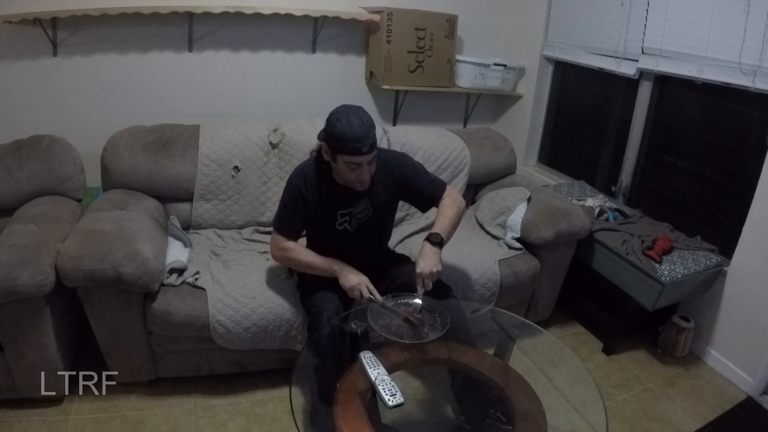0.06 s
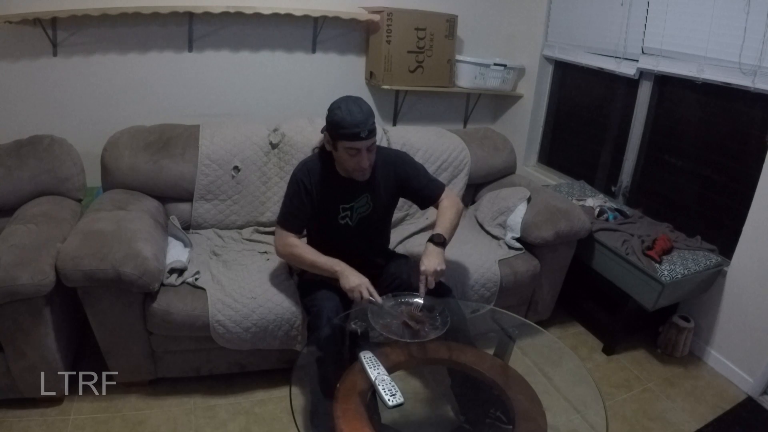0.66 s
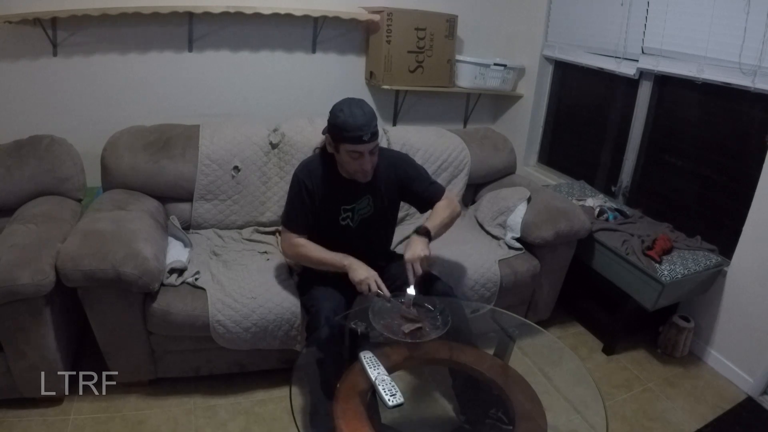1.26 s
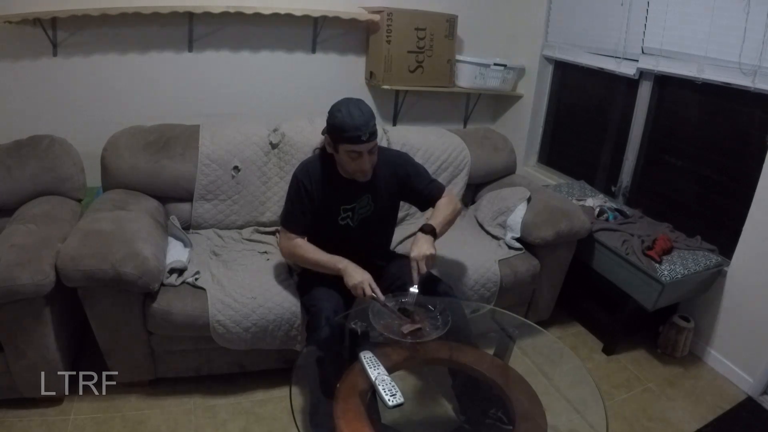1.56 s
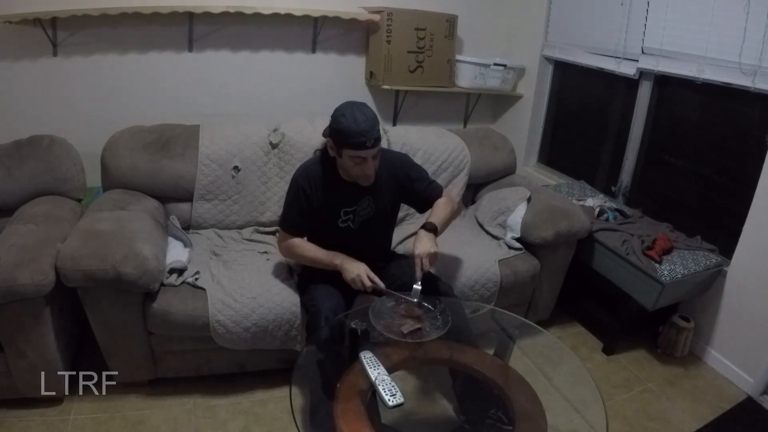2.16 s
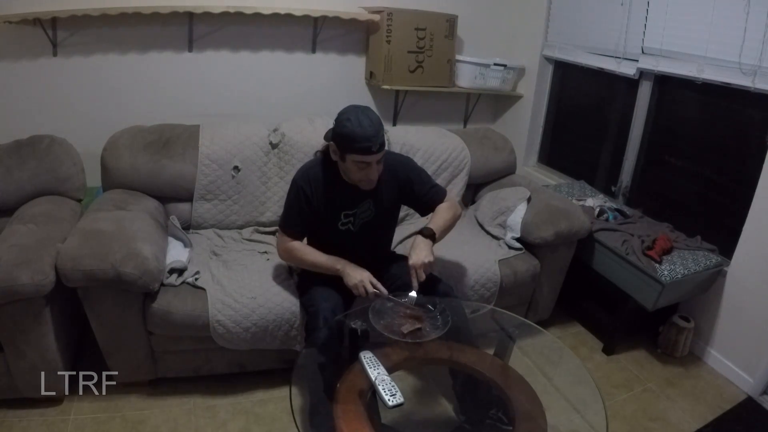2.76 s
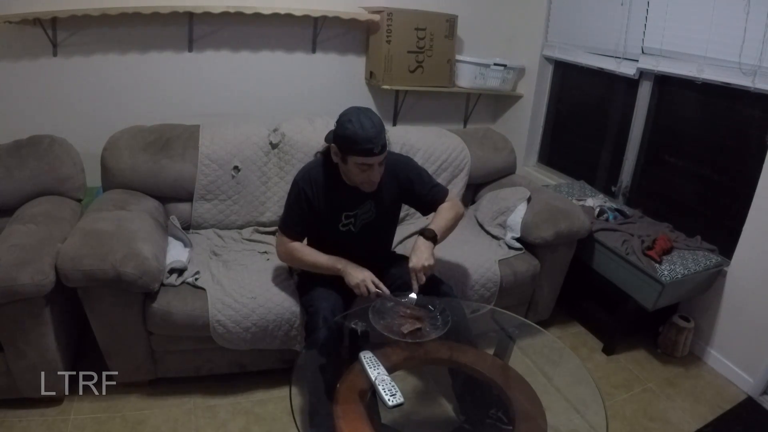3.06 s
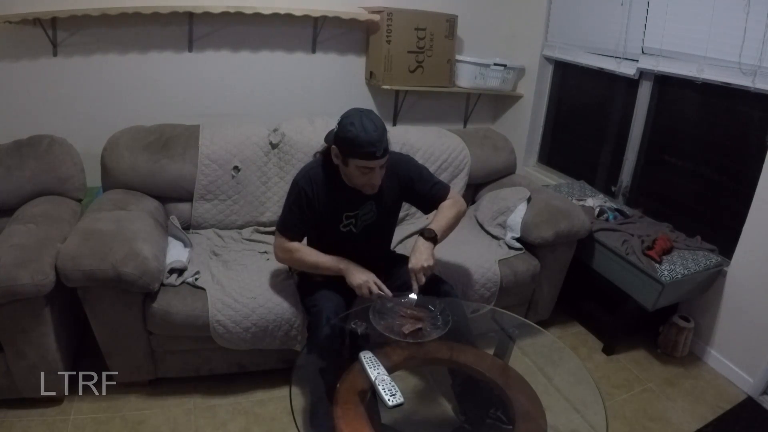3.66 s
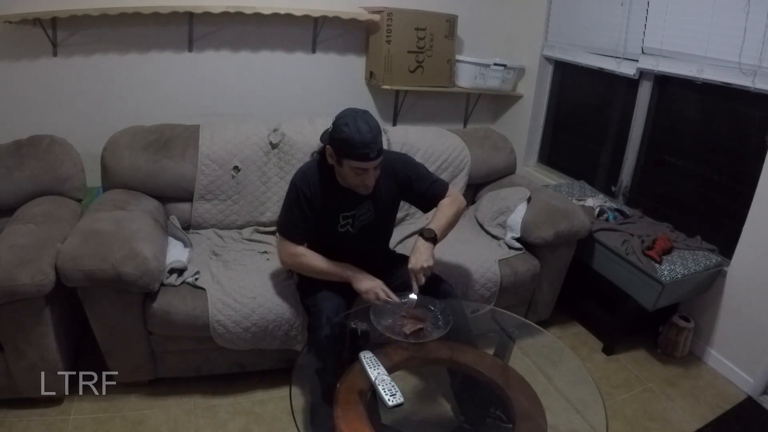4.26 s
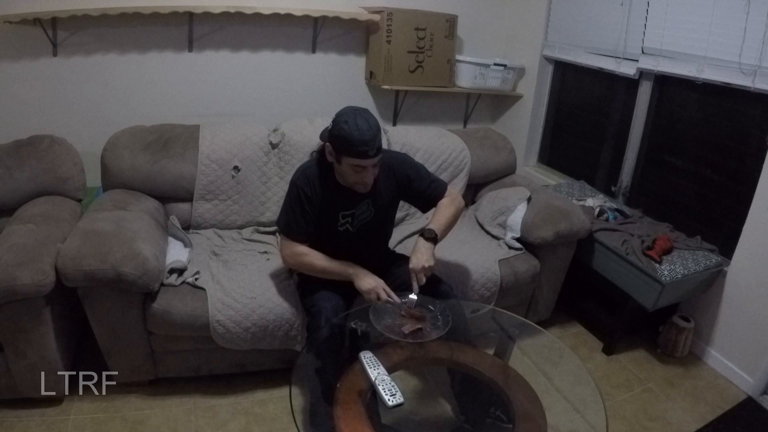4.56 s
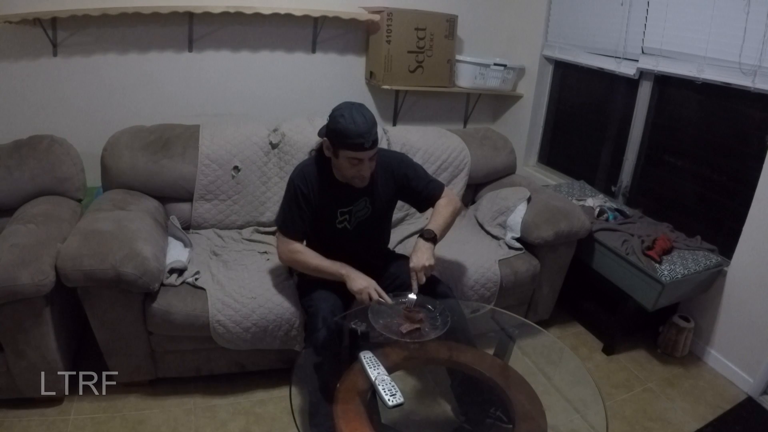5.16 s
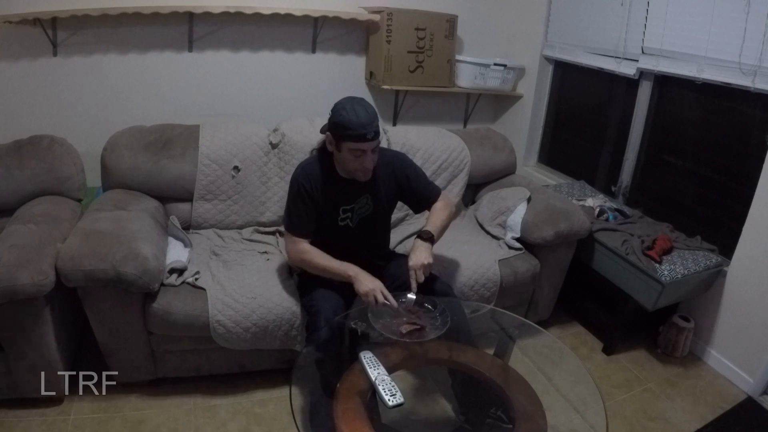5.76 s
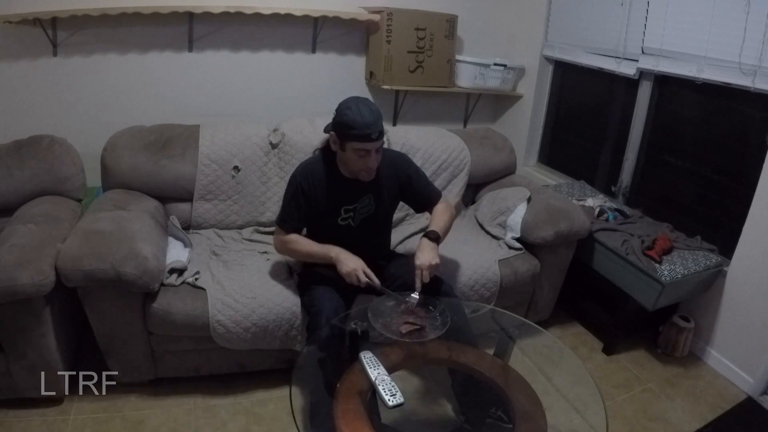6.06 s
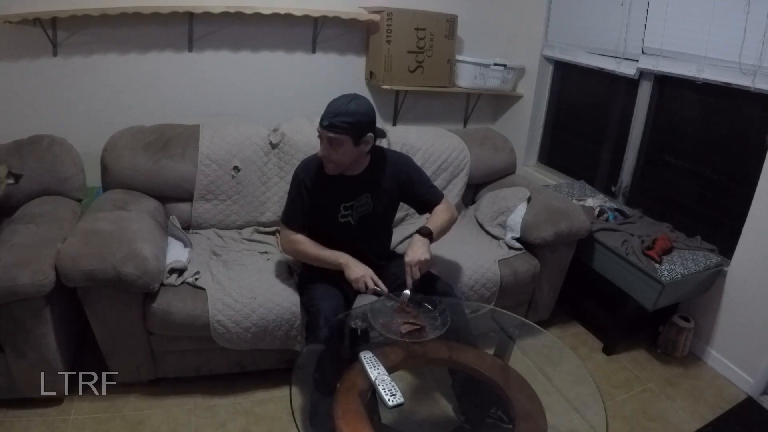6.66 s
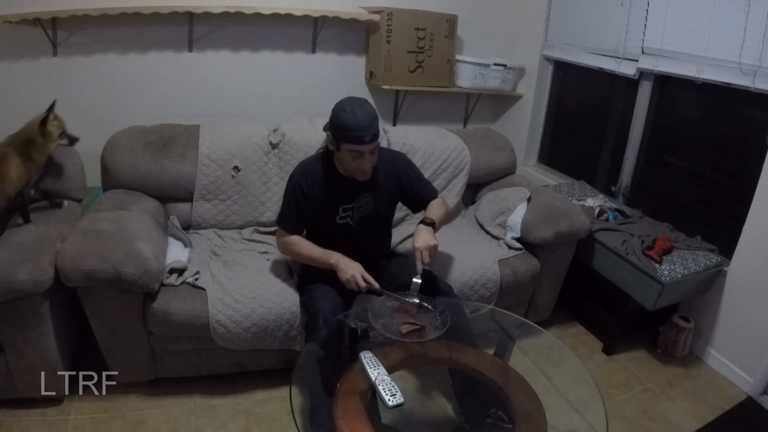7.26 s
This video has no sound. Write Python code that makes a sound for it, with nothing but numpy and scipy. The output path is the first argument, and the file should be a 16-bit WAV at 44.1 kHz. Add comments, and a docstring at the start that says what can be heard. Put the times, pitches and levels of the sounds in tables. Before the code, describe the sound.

A steel knife scrapes briefly on a glass plate and a fork ticks, then one loud clink rings out. After a pause, light sawing rocks the plate, which knocks several times on a glass table. A few more scrapes, another ringing clink and light fork ticks follow. The microphone picks up a short ring of the small living room, with a low throbbing machine hum underneath.

```python
"""A steel knife and fork cut food on a glass plate, set on a glass table in a small living room.
The steel scrapes, ticks and clinks on the plate, and sawing strokes rock the plate against the table top.
The microphone hears the touches directly and as a brief ring of the room. Underneath lie faint room tone
and the low, throbbing hum of a machine somewhere in the house."""
import sys
import numpy as np
from scipy import signal
from scipy.fft import rfft, irfft
from scipy.io import wavfile

SR = 44100
rng = np.random.default_rng(int(sys.argv[2]) if len(sys.argv) > 2 else 0)


def to_wav(s):
    """Save 16-bit WAV."""
    ch = np.atleast_2d(s).T  # columns
    pcm = np.round(np.clip(ch, -1, 1) * 32767)  # PCM
    wavfile.write(sys.argv[1], SR, pcm.astype(np.int16))


N = 323253
TIME = np.arange(N) / SR
AGE = TIME[:24576]  # time axis of a single event, s

# spectrum of a fork tine's light touch: f/Hz, level/dB
TINE_SPECTRUM = [(500, -24), (2200, 5), (3200, 2), (5200, -2), (7000, -8.5), (10300, -10), (11500, -17),
                 (15000, -21)]


def undb(db):
    """Decibels to gain."""
    return 10 ** (np.asarray(db) / 20)


def unit(x):
    """Scale to an energy of one."""
    return x / np.sqrt(np.sum(x ** 2))


def fade(t60):
    """Exponential decay that loses 60 dB in t60 seconds."""
    return np.exp(-np.log(1000) * AGE / t60)


def add(out, t, sound):
    """Mix a sound in at t seconds."""
    start = max(int(t * SR), 0)
    out[start:start + len(sound)] += sound[:len(out) - start]


def colour(spectrum, size, tilt=0):
    """Gain per bin of an outline (f/Hz, level/dB), tilted around 3 kHz in dB per octave."""
    octave = np.log2(np.maximum(np.fft.rfftfreq(size, 1 / SR), 1))
    hz, db = np.transpose(spectrum)
    return undb(np.interp(octave, np.log2(hz), db) + tilt * np.maximum(octave - np.log2(3000), -2))


def click(spectrum, tilt=0):
    """One contact: the shortest causal pulse with the given spectrum."""
    cepstrum = irfft(np.log(colour(spectrum, len(AGE), tilt)))
    cepstrum[1:] *= 2  # fold to minimum phase
    cepstrum[len(AGE) // 2:] = 0
    return unit(irfft(np.exp(rfft(cepstrum))))


def ping(hz, width_hz):
    """One short-lived resonance of the steel."""
    return unit(np.exp(-np.pi * width_hz * AGE) * np.sin(2 * np.pi * hz * AGE))


def ring(modes, swells_per_s=55):
    """Decaying modes; their own reflections make each one swell and sag as it dies."""
    knots = np.arange(64) / swells_per_s
    out = 0
    for hz, db, t60 in zip(*modes):
        echoes = rng.standard_normal(len(knots)) + 1j * rng.standard_normal(len(knots))
        swell = np.interp(AGE, knots, 1 + echoes)
        tone = np.real(swell * np.exp(2j * np.pi * (hz * AGE + rng.random()))) * fade(t60)
        out = out + undb(db) * np.sqrt(t60) * unit(tone)
    attack = np.minimum(AGE / .002, 1)
    return unit(out * attack)


def noise(spectrum, db):
    """Steady noise of a given spectrum and rms level."""
    shaped = irfft(rfft(rng.standard_normal(N)) * colour(spectrum, N), N)
    return undb(db) * np.sqrt(N) * unit(shaped)


def room(x, wet_db, early_db, split_hz=6000):
    """At the microphone: direct sound, reflections off table and walls, a tail whose treble dies first."""
    # spectrum of the straight path from plate to microphone: f/Hz, level/dB
    direct_path = [(1000, -16.5), (2400, -12), (3400, -0.5), (4500, -5), (6500, -6), (10000, -6),
                   (14000, -29)]
    grain, spray = rng.standard_normal((2, len(AGE)))
    low = signal.sosfilt(signal.butter(2, split_hz, fs=SR, output="sos"), grain)
    high = signal.sosfilt(signal.butter(2, split_hz, "high", fs=SR, output="sos"), grain)
    tail = low * fade(t60=.52) - high * fade(t60=.21)
    early = spray * np.abs(spray) * fade(t60=.15)
    arrival = np.clip(AGE / .001 - .5, 0, 1)
    reflections = unit(arrival * (unit(tail) + undb(early_db) * unit(early)))
    response = click(direct_path) + undb(wet_db) * reflections
    return signal.fftconvolve(x, unit(response))[:len(x)]


def room_tone():
    """The steady low rumble and faint air of the living room."""
    # spectra of the rumble and the air: f/Hz, level/dB
    rumble_spectrum = [(12, -21), (25, -6), (40, -4), (56, 0.5), (72, -20), (100, -4), (120, -5.5),
                       (130, -22), (172, -14), (200, -23.5), (320, -21.5), (450, -49)]
    air_spectrum = [(210, -10), (350, 1.5), (385, -5), (552, -9.5), (844, -11), (913, -7), (1170, -11.5),
                    (1610, -6.5), (2040, -12.5), (2240, -6), (2500, -11.5), (3820, -11.5), (5150, -22),
                    (15000, -31)]
    lowpass = signal.butter(4, 600, fs=SR, output="sos")
    rumble = signal.sosfilt(lowpass, noise(rumble_spectrum, db=-47.5))
    return rumble + noise(air_spectrum, db=-58.5)


def machine_hum(waver_db=-.35, throb_s=.225, delay_s_per_hz=1 / 3000):
    """Machine tones beat about three times a second; the house delays higher ones, easing the pulse."""
    # the machine's tones, one list each: f/Hz, rms level/dB
    tone_hz = [27.39, 46.77, 54.78, 57.72, 60.66, 82.17, 85.11, 98.31, 109.56, 112.5, 312.2]
    tone_db = [-73, -75, -48, -40, -84, -58, -47.5, -58, -67, -45, -64.5]
    knots = np.linspace(0, TIME[-1], num=30)
    out = 0
    for hz, db in zip(tone_hz, tone_db):
        waver = waver_db * np.interp(TIME, knots, rng.standard_normal(len(knots)))
        phase = 2 * np.pi * hz * (TIME - throb_s - hz * delay_s_per_hz)
        out = out + np.sqrt(2) * undb(db + waver) * np.cos(phase)
    return out


def knife_scrapes(slips_per_s=1600, squeak_db=-2):
    """The serrated edge sticks and slips, ringing the blade; its squeak depends on where it touches."""
    # drags over the glass: t/s at the peak, length/s, level/dB, squeak f/Hz
    drags = [(.005, 0.033, -51, 3780), (.459, 0.09, -57.5, 3870), (.618, 0.063, -47.5, 3800),
             (.715, 0.031, -53, 3800), (3.37, .07, -62, 3400), (5.154, 0.028, -45.5, 3080),
             (5.209, .022, -50.5, 3530), (5.253, 0.039, -52, 3860)]
    # spectrum of the blade: f/Hz, level/dB
    blade_spectrum = [(500, -26), (1020, 4), (1400, -13), (2500, -11), (2950, 9), (3400, 4), (3900, 1.5),
                      (4400, -29), (5800, -11), (6550, -2), (7200, -26), (14000, -50)]
    sawing = [(4.58 + k * .143, .08, -61, 3480) for k in range(4)]  # light, even drags
    out, blade = np.zeros(N), click(blade_spectrum)
    middle = AGE[-1] / 2
    for t, length, db, hz in list(drags) + sawing:
        pressure = undb(db) * np.exp(-(2 * (AGE - min(t, middle)) / length) ** 2)
        slips = (rng.random(len(AGE)) < slips_per_s / SR) * rng.standard_normal(len(AGE))
        body = unit(blade + undb(squeak_db) * ping(hz, width_hz=170))
        add(out, t - middle, signal.fftconvolve(pressure * slips / np.std(slips), body))
    return room(out, wet_db=7.5, early_db=3.5)


def blip(t=.277, half_length_s=.02, hz=432, db=-54):
    """One faint, short, low tone."""
    return undb(db) * np.exp(-((TIME - t) / half_length_s) ** 2) * np.sin(2 * np.pi * hz * TIME)


def fork_ticks(gap_s=.004, again_db=-3.5):
    """A tine snaps, pings and touches again, softer and brighter, too lightly to ring the plate."""
    # light touches: t/s, level/dB, tilt/(dB per octave), tine f/Hz, ping/dB relative to the snap
    ticks = [(1.013, -27.5, 1, 3800, 1.5), (1.324, -38, 2, 6450, -3), (6.151, -27.5, -5, 3430, -8),
             (6.342, -23.5, 4.5, 3790, -12), (6.376, -31, 5, 5100, 0)]
    out = np.zeros(N)
    for t, db, tilt, hz, ping_db in ticks:
        add(out, t, undb(db) * (click(TINE_SPECTRUM, tilt) + undb(ping_db) * ping(hz, width_hz=180)))
        add(out, t + gap_s, undb(db + again_db) * click(TINE_SPECTRUM, tilt + 3))
    return room(out, wet_db=8.5, early_db=-2)


def clinks(first_gap_s=.0042, gap_power=1.72, tilt_per_loss_db=1.38):
    """Steel strikes glass and skips on in lighter, brighter touches; plate, fork and knife ring."""
    # hits on the plate: t/s, contact level/dB, tilt/(dB per octave), room/dB, loss per rebound/dB,
    # ring level/dB of plate, fork and knife
    hits = [(1.4573, 8.5, -3.5, 5.5, 8, 7.5, 2, -15), (5.2655, -21, -1.5, 13, 1.5, -33, -15, -4.5),
            (5.7405, -2.5, .5, 17, .8, -15.5, 3.5, -.5)]
    # spectrum of the contact: f/Hz, level/dB
    steel_on_glass = [(100, -19.5), (250, -19.5), (480, -35.5), (900, -17), (1500, -15.5), (2400, -6),
                      (3300, 2.5), (3900, -2), (4500, -17), (5600, -3), (6500, -13), (7100, -22),
                      (8250, -16.5), (9100, -21.5), (10400, -17.5), (13500, -26.5), (15000, -36)]
    # modes of each object, in three rows: f/Hz, level/dB, t60/s
    plate = [
        [1023, 1741, 1843, 2165, 2399, 2612, 2799, 2911, 3041, 3259, 3387, 3563, 3869, 3993, 4719, 5372, 6052,
         6450, 6605, 8077, 8320, 10341],
        [-7, 1, -2, -8, 0, -3, 5, 1, 1, 0, 1, -2, -1, -6, -6, -9, -11, -11, -12, -14, -15, -21],
        [.5, .48, .52, .41, .33, .36, .38, .4, .38, .38, .34, .25, .28, .22, .25, .48, .28, .3, .38, .32, .35,
         .22],
    ]
    fork = [
        [1518, 2239, 2874, 2934, 3277, 3443, 3555, 3861, 4178, 5425, 5671, 5765, 6492, 6590, 8150, 10300],
        [-13, -17, 1, -4, -6, 0, -1, -7, -5, -9, -9, -9, -2, -8, -18, -19],
        [.33, .25, .3, .28, .3, .34, .24, .36, .33, .28, .3, .3, .28, .3, .2, .24],
    ]
    knife = [
        [2820, 2875, 2997, 3733, 5400, 5682, 5770, 6548, 6630, 8540, 10365, 10665],
        [0, -3, -3, -6, -15, -10, -11, -7, -11, -17, -21, -22],
        [.32, .25, .3, .26, .28, .3, .28, .27, .24, .3, .25, .2],
    ]
    out = np.zeros(N)
    for t, db, tilt, wet_db, loss_db, plate_db, fork_db, knife_db in hits:
        touches = np.zeros(len(AGE))
        for k in range(4):
            brightening = tilt_per_loss_db * loss_db * min(k, 1)
            touch = undb(db - k * loss_db) * click(steel_on_glass, tilt + brightening)
            add(touches, first_gap_s * k ** gap_power, touch)
        add(out, t, room(touches, wet_db, early_db=2.5))
        for modes, ring_db in (plate, plate_db), (fork, fork_db), (knife, knife_db):
            add(out, t, undb(ring_db) * ring(modes))
    return out


def plate_knocks(firm_db=-7, drop_db=-8.5, table_db=1):
    """Sawing tips the plate against the table top; it drops back and the table rings low and dull."""
    # knocks of the rocking plate: t/s, level/dB
    knocks = [(3.605, -20.5), (3.877, -17.5), (4.099, -7), (4.363, -8.5), (4.703, -17), (4.730, -19)]
    # spectrum of the contact: f/Hz, level/dB
    glass_on_glass = [(100, -8), (230, 12), (480, -7), (750, 2), (1600, 7.5), (2200, -1.5), (3200, 2.5),
                      (4400, -9), (5000, -15.5), (5900, -7), (8000, -25.5), (14500, -33)]
    # modes of the glass table, in three rows: f/Hz, level/dB, t60/s
    table = [
        [255, 945, 1017, 1162, 1301, 1515, 1716, 1950, 2433, 2800, 3115, 3866, 4482],
        [-10, -10, -3, -10, -8, -4, 1, -9, -6, -8, -7, -13, -16],
        [.6, .3, .48, .3, .28, .34, .45, .36, .32, .33, .22, .3, .35],
    ]
    thuds, rings = np.zeros((2, N))
    for t, db in knocks:
        softer_db = firm_db - db  # a softer knock is duller and settles later
        tilt = 2.5 - .2 * softer_db
        settles = t + .006 + .0008 * softer_db
        add(thuds, t, undb(db) * click(glass_on_glass, tilt))
        add(thuds, settles, undb(db + drop_db) * click(glass_on_glass, tilt - 4))
        add(rings, settles, undb(db + table_db) * ring(table))
    return room(thuds, wet_db=17, early_db=-4) + rings


def close_click(t=4.269, db=-25, ping_db=4):
    """One dull click close to the microphone, with almost no room on it."""
    touch = click(TINE_SPECTRUM, tilt=-14) + undb(ping_db) * ping(hz=1750, width_hz=160)
    out = np.zeros(N)
    add(out, t, room(undb(db) * touch, wet_db=-14, early_db=-.5))
    return out


def scene():
    """Cutlery at the table over the background of the room, on one microphone."""
    background = room_tone() + machine_hum() + blip()
    cutlery = knife_scrapes() + fork_ticks() + clinks() + plate_knocks() + close_click()
    return (background + cutlery)[None]


def record(dry):
    """The camera cuts the treble steeply above 15.3 kHz."""
    return signal.sosfilt(signal.ellip(10, .2, 80, 15300, fs=SR, output="sos"), dry)


dry = scene()
out = record(dry)
to_wav(out)
```